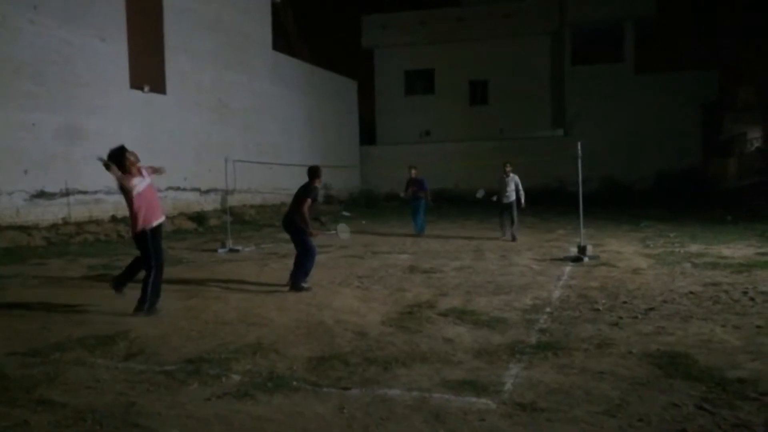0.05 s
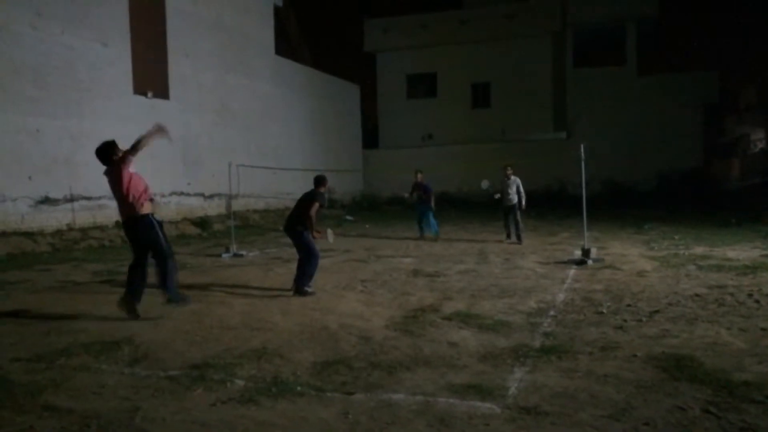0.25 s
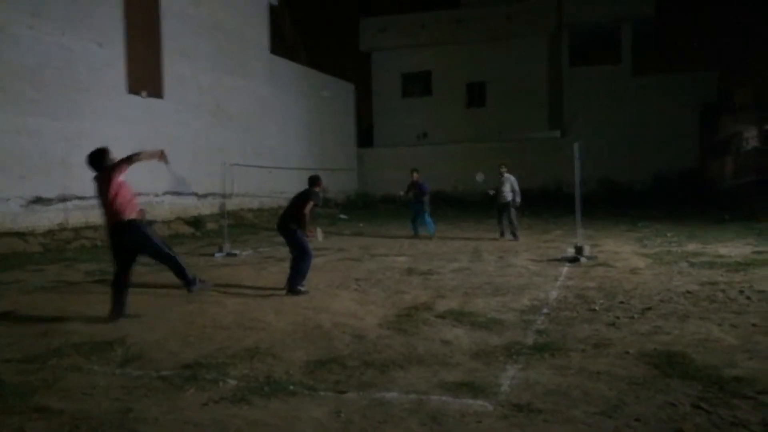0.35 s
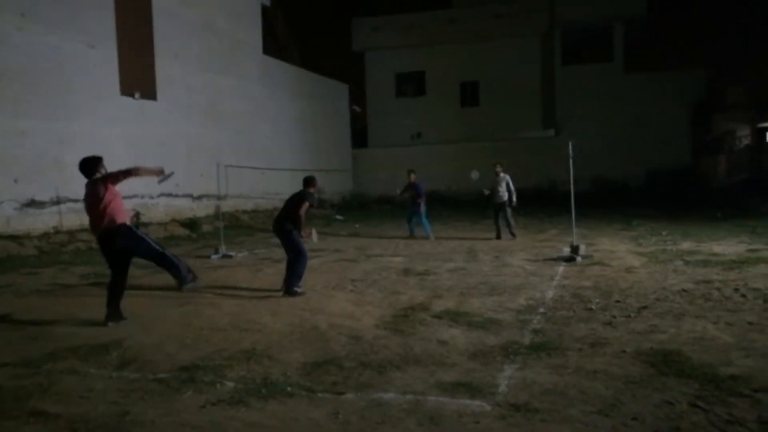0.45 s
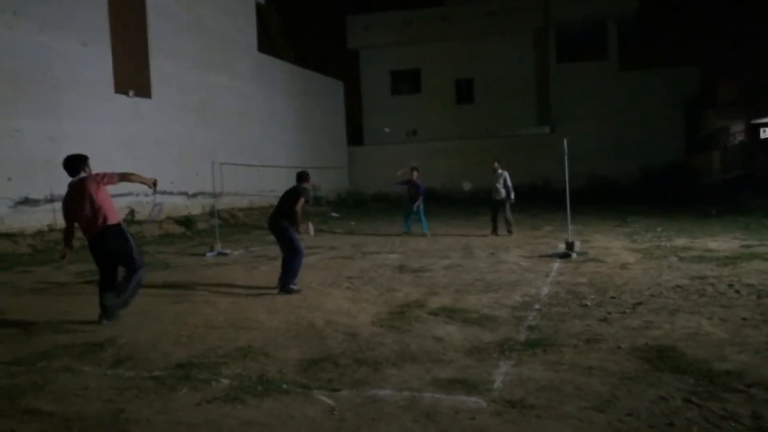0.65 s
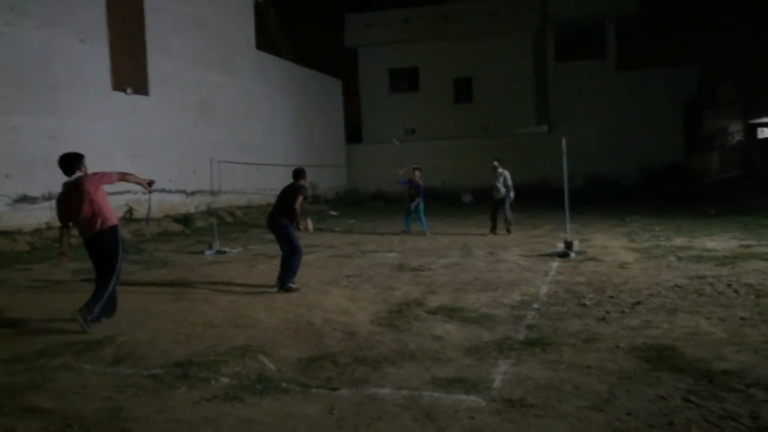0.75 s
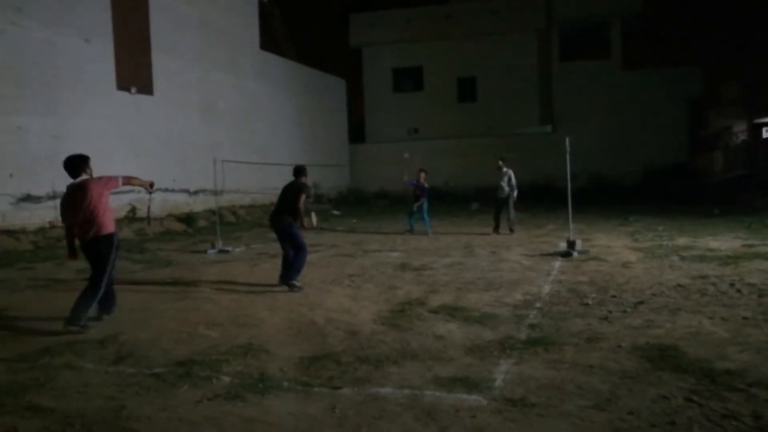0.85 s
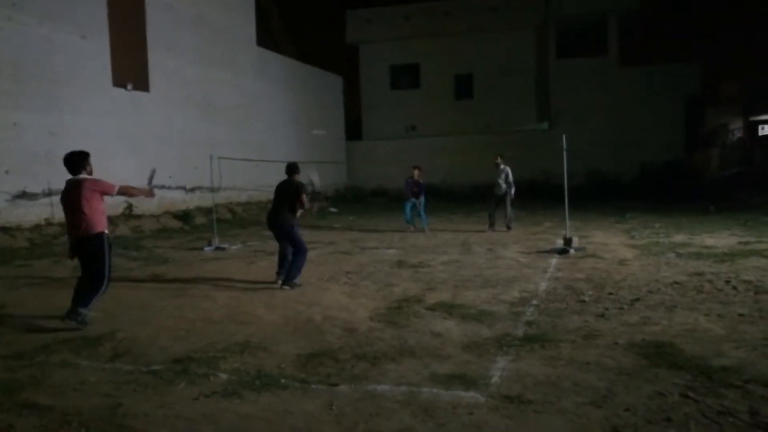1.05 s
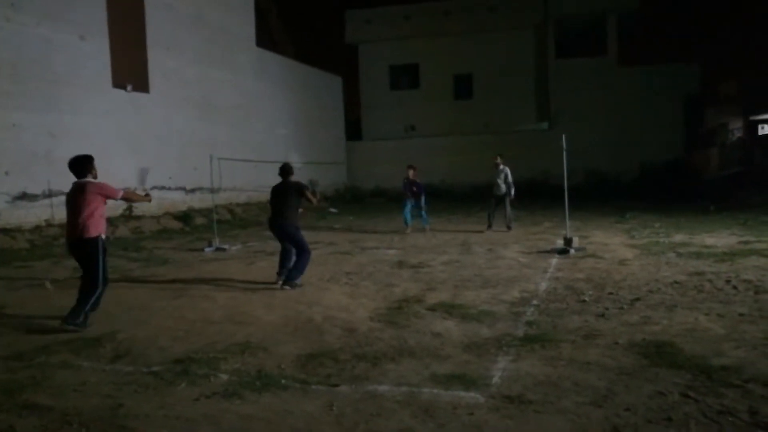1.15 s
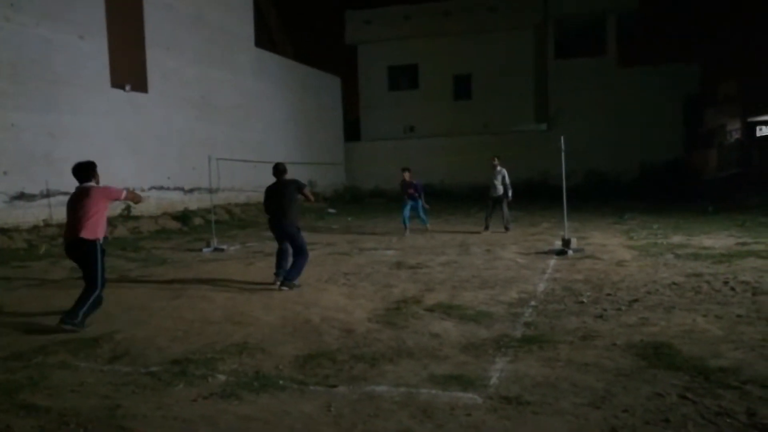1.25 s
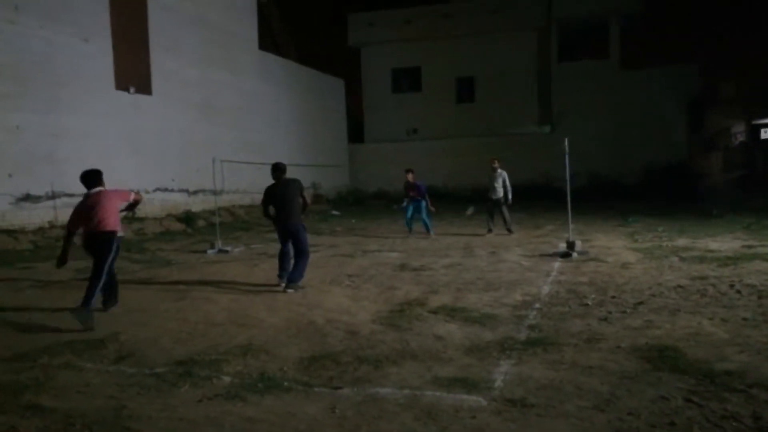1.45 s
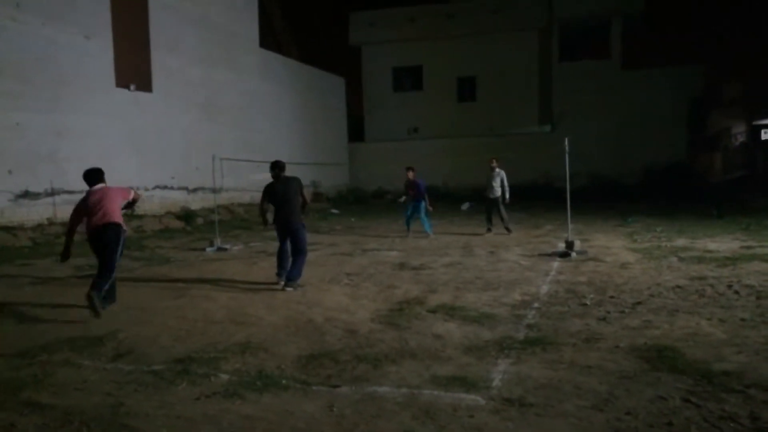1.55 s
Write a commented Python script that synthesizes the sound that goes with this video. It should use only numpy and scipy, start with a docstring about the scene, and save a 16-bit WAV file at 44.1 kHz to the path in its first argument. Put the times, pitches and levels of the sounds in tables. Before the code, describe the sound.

Badminton in a walled dirt yard, microphone near one player: a sharp, bright racket crack with quick echoes and a low boom, soft steps, a shoe slide, a fainter distant string ping, then more dull footfalls.

```python
"""Badminton on a dirt court between house walls at night, over a low outdoor rumble and soft hiss.
A near racket swishes (a noise whistle) and cracks against the shuttlecock: a shaped noise burst plus
decaying string and frame modes. The walls throw the crack back as delayed, smeared copies and the yard
booms. Feet land (dull bursts) and a shoe slides on grit (bright noise); then a far racket returns the
shuttle with a ping of its strings. Last, the rumble swells and more feet land."""
import sys
import numpy as np
from scipy import signal
from scipy.fft import rfft, irfft
from scipy.io import wavfile
from scipy.ndimage import uniform_filter1d

SR = 44100
rng = np.random.default_rng(int(sys.argv[2]) if len(sys.argv) > 2 else 0)


def dump(signal):
    """Clip the signal to [-1, 1] and save it as 16-bit WAV at the path in sys.argv[1]."""
    limited = np.clip(np.atleast_2d(signal).T, -1, 1)
    pcm = np.round(limited * 32767).astype(np.int16)
    wavfile.write(sys.argv[1], SR, pcm)


N = 70560  # samples, 1.6 s
EDGE_HZ = 15900  # upper band limit


def amp(db):
    """Amplitude ratio: 20 dB is a factor of ten."""
    return 10 ** (np.asarray(db) / 20)


def unit(x):
    """Normalisation: scales to a root-mean-square of 1."""
    return x / np.sqrt(np.mean(x ** 2) + 1e-20)


def read(points, hz):
    """Logarithmic frequency scale: interpolates a (frequency, value) table along it."""
    f, value = np.transpose(points)
    return np.interp(np.log(hz + 1), np.log(f + 1), value)


def add(mix, start, sound):
    """Superposition: adds a stereo sound into the mix from a start time [s], cut at the end."""
    part = mix[:, round(start * SR):][:, :sound.shape[1]]
    part += sound[:, :part.shape[1]]


def colour(x, points, size=4096):
    """Minimum-phase filtering: a causal response with the given (frequency [Hz], gain [dB]) shape."""
    hz = abs(np.fft.fftfreq(size, 1 / SR))
    log_gain = np.log(amp(read(points, hz)))
    # the Hilbert transform of the log gain gives the minimum phase
    response = np.exp(np.conj(signal.hilbert(log_gain)))
    taps = np.fft.ifft(response).real[:size // 2]
    return signal.fftconvolve(x, taps[None], axes=1)[:, :x.shape[1]]


def lean(x, points):
    """Interchannel level difference: splits (frequency [Hz], left minus right [dB]) equally."""
    left = colour(x[:1], [(hz, db / 2) for hz, db in points])
    right = colour(x[1:], [(hz, -db / 2) for hz, db in points])
    return np.vstack([left, right])


def pair(x, alike):
    """Interchannel coherence: mixes two unrelated noises as mid and side to the tabled likeness."""
    likeness = read(alike, np.fft.rfftfreq(x.shape[1], 1 / SR))
    angle = np.arccos(np.clip(likeness, 0, 1)) / 2
    mid, side = rfft(x) * [np.cos(angle), np.sin(angle)]
    return irfft([mid + side, mid - side], x.shape[1])


# left-right likeness of steady noise: (frequency [Hz], likeness [0-1])
NOISE_ALIKE = [(30, 1), (120, 1), (240, 0.99), (480, 0), (1200, 0), (15000, 0)]


def swell(levels, shape):
    """Amplitude modulation: coloured noise follows a (time [s], level [dB]) curve."""
    noise = unit(colour(pair(rng.standard_normal((2, N)), NOISE_ALIKE), shape))
    t = np.arange(N) / SR
    return noise * amp(np.interp(t, *np.transpose(levels), left=-150, right=-150))


# left-right likeness of impacts and reverberation: (frequency [Hz], likeness [0-1])
IMPACT_ALIKE = [(30, 0.35), (180, 1), (350, 0.81), (900, .5), (2000, 0.027), (5000, 0), (15000, 0)]


def burst(t60, rise=1e-4, size=12288, count=6):
    """Impulsive excitation: decaying noise, nearly even in spectrum, mean channel energy 1."""
    t = np.arange(size) / SR
    envelope = (1 - np.exp(-t / rise)) * amp(-60 * t / t60)
    x = pair(rng.standard_normal((2, size)), IMPACT_ALIKE) * envelope
    # alternately flatten the spectrum and confine the sound in time
    for _ in range(count):
        flat = irfft(np.exp(1j * np.angle(rfft(x))))
        x = flat * np.minimum(10 * envelope, 1)
    return unit(x) / np.sqrt(size)


# steady background spectrum: (frequency [Hz], relative level per Hz [dB])
AIR_SPECTRUM = [(12, -30), (22, -3), (50, 0.95), (90, -6), (137, -5), (233, -13), (375, -23), (620, -27),
                (800, -23), (1120, -15.5), (1400, -22), (2060, -23), (2600, -20), (3400, -31), (5900, -36),
                (7100, -33.5), (7900, -41), (15800, -44)]
AIR_DB, AIR_PATCHY_DB = -54, 1.3  # overall rms level; rms of the level drift


def air():
    """Stationary noise with slow modulation: distant rumble and soft hiss drift in patches."""
    noise = pair(rng.standard_normal((2, N)), NOISE_ALIKE)
    hz, t, z = signal.stft(noise, SR, nperseg=2048)
    patches = rng.standard_normal(z.shape[1:])  # frequency by time
    patches = uniform_filter1d(patches, size=10, axis=0)
    patches = unit(uniform_filter1d(patches, size=5, axis=1))
    z = z * amp(read(AIR_SPECTRUM, hz)[:, None] + AIR_PATCHY_DB * patches)
    return amp(AIR_DB) * unit(signal.istft(z, SR, nperseg=2048)[1][:, :N])


# swelling low rumble: (time [s], level [dB])
RUMBLE_LEVELS = [(.9, -77), (.96, -59.5), (1.02, -48.5), (1.08, -64), (1.25, -72), (1.3, -57), (1.39, -54),
                 (1.45, -75)]
# its spectrum: (frequency [Hz], relative level [dB])
RUMBLE_SPECTRUM = [(15, -1), (40, -4), (65, 4.5), (110, -13.5), (250, -43), (1000, -72)]


def rumble():
    """Low-frequency noise under an envelope: the rumble swells twice."""
    return swell(RUMBLE_LEVELS, RUMBLE_SPECTRUM)


# boom of the yard after the smash: (time [s], level [dB])
BOOM_LEVELS = [(.22, -59), (.27, -50.5), (.36, -53), (.45, -63), (.7, -66)]
# its spectrum: (frequency [Hz], relative level [dB])
BOOM_SPECTRUM = [(30, -29), (85, -7), (140, 2.5), (220, -5), (400, -28), (1500, -64)]


def boom():
    """Low-frequency reverberation: noise near 140 Hz rises at the smash and dies away."""
    return swell(BOOM_LEVELS, BOOM_SPECTRUM)


# diffuse ring of the yard: (frequency [Hz], level [dB])
YARD_SPECTRUM = [(100, -14.5), (300, -6.5), (900, -8), (2500, -7.5), (4000, -6.5), (7000, -8.5),
                 (10000, -4), (15000, -9)]
# its decay: (frequency [Hz], time to fall 60 dB [s])
YARD_DECAY = [(100, 0.65), (400, 0.66), (1000, 0.61), (2700, 0.99), (5000, 0.89), (8000, 0.61),
              (11000, 0.76), (15000, 0.25)]
DIFFUSE_RISE_S = .008


def yard(x):
    """Diffuse reverberation: convolution with noise whose decay time depends on frequency."""
    noise = pair(rng.standard_normal((2, SR)), IMPACT_ALIKE)
    hz, t, z = signal.stft(noise, SR, nperseg=256)
    decay = amp(-60 * t / read(YARD_DECAY, hz)[:, None])
    rise = 1 - np.exp(-t / DIFFUSE_RISE_S)
    tail = signal.istft(z * decay * rise, SR, nperseg=256)[1]
    tail = colour(tail / np.linalg.norm(tail[0]), YARD_SPECTRUM)
    return signal.fftconvolve(x, tail, axes=1)[:, :N]


# shoe sliding on grit: (time [s], level [dB])
SCUFF_LEVELS = [(.62, -82), (.72, -70.5), (.77, -64), (.81, -65.5), (.84, -86)]
# its spectrum: (frequency [Hz], relative level [dB])
SCUFF_SPECTRUM = [(500, -34), (5000, -13), (8000, -12), (10000, 1), (12000, -3), (14000, -12), (16000, -13)]


def scuff():
    """Friction noise: one gritty slide, brightest near 10 kHz."""
    return swell(SCUFF_LEVELS, SCUFF_SPECTRUM)


# footfalls: (time [s], relative level [dB], nominal time to fall 60 dB [s])
FOOTFALLS = [(.275, -3, 0.19), (.349, -1, 0.018), (.385, 1, 0.16), (.733, -8, .06), (0.965, -3, 0.045),
             (1.222, 0.5, .018), (1.246, -11, 0.025), (1.258, -4.5, 0.043), (1.276, -4.5, 0.11),
             (1.31, -7.5, 0.15), (1.343, -7, 0.068)]
# their spectrum: (frequency [Hz], level [dB])
FOOTFALL_SPECTRUM = [(40, -25), (130, -11.5), (290, -2.5), (600, -12), (1100, -21.5), (2500, -25),
                     (4000, -44), (15000, -58)]


def footsteps():
    """Damped impact: packed dirt passes the lows, so each landing is dull; the yard rings too."""
    steps = np.zeros((2, N))
    for start, db, t60 in FOOTFALLS:
        add(steps, start, amp(db) * burst(t60))
    steps = colour(steps, FOOTFALL_SPECTRUM)
    return steps + yard(steps)


# swing of the near racket: (time [s], level [dB], whistle frequency [Hz])
SWING_PATH = [(.178, -80, 626), (.189, -54.5, 608), (.204, -55, 604), (.219, -48, 650), (.235, -86, 520)]
SWING_WIDTH_HZ = 110  # bandwidth of each of two equal poles


def swing():
    """Aeolian tone: air whistles round the shaft into the blow, a narrow noise band gliding in pitch."""
    t = np.arange(N) / SR
    path_t, db, hz = np.transpose(SWING_PATH)
    pole = np.exp(-np.pi * SWING_WIDTH_HZ / SR)
    noise = rng.standard_normal(N) + 1j * rng.standard_normal(N)
    flutter = signal.lfilter([1 - pole], np.poly([pole, pole]), noise)
    # shift the low-pass flutter up to the gliding frequency
    cycles = np.cumsum(np.interp(t, path_t, hz)) / SR
    whistle = (flutter * np.exp(2j * np.pi * cycles)).real
    return unit(whistle) * amp(np.interp(t, path_t, db, left=-150, right=-150))


CRACK_RISE_S = .0007


def ringing(modes, t):
    """Modal synthesis: strings and frame ring as exponentially decaying sines."""
    ring = 0
    for hz, db, t60 in modes:
        # opposite phase shifts give the channels their likeness
        shift = np.arccos(np.clip(read(IMPACT_ALIKE, hz), 0, 1)) / 2 * np.array([[-1], [1]])
        envelope = amp(db - 60 * t / t60) * (1 - np.exp(-t / CRACK_RISE_S))
        ring = ring + envelope * np.sin(2 * np.pi * hz * t + shift)
    return ring


AIR_LOSS_HZ, AIR_LOSS_DB_PER_S = 6100, 48  # loss starts here; its rate at EDGE_HZ, per second of delay
LIFT_WIDTH = 1.244  # frequency ratio from a lift's centre to its foot


def reflection(outward, delay, smear, hz, lift_db):
    """Rough-wall reflection: smeared in time, one band favoured, treble lost along the path."""
    echo = signal.fftconvolve(outward, burst(smear), axes=1)
    echo = colour(echo, [(hz / LIFT_WIDTH, 0), (hz, lift_db), (hz * LIFT_WIDTH, 0)])
    return colour(echo, [(AIR_LOSS_HZ, 0), (EDGE_HZ, -AIR_LOSS_DB_PER_S * delay)])


# left-right shading of sound straight from a racket, as it faces: (frequency [Hz], left minus right [dB])
DIRECT_LEAN = [(300, -3.5), (1300, -2), (2500, -1.5), (4000, 7), (5600, 9), (8500, 5), (13500, -2.5)]
RING_BACK_DB = -2.5  # the ringing carries to the walls less than the crack does
SCATTER_DB, SCATTER_T60_S = -8.5, .11  # near scatter, nominal decay


def racket(blow, crack_spectrum, crack_t60, modes, echoes, wet_db):
    """Impact and image sources: the cork cracks, the racket rings, ground and walls answer."""
    start, db = blow
    crack = colour(burst(crack_t60, CRACK_RISE_S), crack_spectrum)
    ring = ringing(modes, np.arange(crack.shape[1]) / SR)
    outward = crack + amp(RING_BACK_DB) * ring
    heard, sent = np.zeros((2, 2, N))
    add(sent, start, outward)
    add(heard, start, lean(crack + ring, DIRECT_LEAN))
    scatter = signal.fftconvolve(outward, burst(SCATTER_T60_S, DIFFUSE_RISE_S), axes=1)
    add(heard, start, amp(SCATTER_DB) * scatter)
    for delay, echo_db, smear, hz, lift_db in echoes:
        echo = reflection(outward, delay, smear, hz, lift_db)
        add(heard, start + delay, amp(echo_db) * echo)
    return amp(db) * (heard + amp(wet_db) * yard(sent))


# far racket's blow: (time [s], level [dB])
RETURN_BLOW = (.8948, -22.5)
# crack of the cork on its strings: (frequency [Hz], relative level [dB])
RETURN_SPECTRUM = [(100, -0.5), (270, 20.5), (500, 1), (750, 15), (1400, 2.5), (2600, 11), (3200, 8.5),
                   (3900, -2), (5200, -6), (8000, -14), (10000, -3), (13000, -18), (16000, -22)]
# its strings: (frequency [Hz], relative level [dB], time to fall 60 dB [s])
RETURN_STRINGS = [(859.5, -24.5, 0.26), (1740, -33, .16), (2720, -38, 0.14), (3330, -40, 0.11)]
# its wall echoes: (delay [s], relative level [dB], nominal smear time to fall 60 dB [s],
# favoured frequency [Hz], lift there [dB])
RETURN_WALLS = [(.0265, -1.5, 0.0011, 2650, 5.4), (.036, -2.5, .04, 5140, 12.5), (.055, -7, .05, 5030, 22),
                (.073, -10.5, .02, 3700, 17), (.09, -15, 0.41, 4800, 15)]


def far_return():
    """Modal ringing after impact: the far strings ping, longest near 860 Hz."""
    return racket(RETURN_BLOW, RETURN_SPECTRUM, crack_t60=.03, modes=RETURN_STRINGS,
                  echoes=RETURN_WALLS, wet_db=4.5)


# near racket's blow: (time [s], level [dB])
SMASH_BLOW = (.2212, 0)
# crack of the cork on its strings: (frequency [Hz], relative level [dB])
SMASH_SPECTRUM = [(60, -24), (220, -9.5), (330, 7), (700, 0), (1050, 0.5), (1400, 1), (1950, -4),
                  (2500, 10.5), (3200, 5.5), (4000, 4.5), (6000, 0), (8000, -4), (11500, -6), (13700, -6.5),
                  (16000, -16)]
# its strings and frame: (frequency [Hz], relative level [dB], time to fall 60 dB [s])
SMASH_STRINGS = [(362, -32, 0.027), (442, -38.5, 0.056), (894, -24.5, 0.052), (956, -34, 0.15),
                 (1312, -24.5, 0.034), (1606, -25, 0.028), (1793, -39.5, 0.27), (2261, -27.5, 0.059),
                 (2407, -26.5, 0.029), (2597, -27, 0.032), (3080, -33, 0.067), (3606, -27, 0.046),
                 (5406, -28, 0.029)]
# its wall echoes: (delay [s], relative level [dB], nominal smear time to fall 60 dB [s],
# favoured frequency [Hz], lift there [dB])
SMASH_WALLS = [(.034, -11, 0.033, 2460, 8), (.037, -10, 0.043, 9400, 11.5), (.047, -17, 0.024, 2500, 4),
               (.062, -20.5, 0.021, 2360, -1), (0.088, -41, .003, 3500, -6), (.112, -19, 0.00051, 4600, 7),
               (.128, -18.5, .002, 1180, 0), (.153, -22.5, 0.0051, 2500, 8.5),
               (.1645, -24, .012, 3400, 17.5), (0.18, -27.5, 0.011, 3360, 18.5),
               (0.193, -30, 0.016, 3430, 21.5), (.16, -23.5, 0.34, 5070, 12.5),
               (0.225, -29, 0.037, 2920, 10), (.264, -31, 0.056, 4800, 15.5)]


def smash():
    """Broadband impact: the near blow cracks, strings and frame ring, and walls throw it back."""
    return racket(SMASH_BLOW, SMASH_SPECTRUM, crack_t60=.028, modes=SMASH_STRINGS,
                  echoes=SMASH_WALLS, wet_db=-3)


def scene():
    """Superposition: both rackets, swing, feet and background sum linearly."""
    rackets = smash() + far_return()
    play = swing() + rackets + footsteps() + scuff()
    return play + air() + boom() + rumble()


# difference of the two microphone ports: (frequency [Hz], left minus right [dB])
PORT_LEAN = [(100, 0.5), (380, -2), (680, 8), (900, -0.5), (1300, -1), (1750, -9), (2500, -12),
             (3300, -8.5), (4300, -7), (5600, -0.5), (7500, 0), (10000, -5.5), (14000, -2.5)]


def record(dry):
    """Linear filtering: each microphone port has its own colour; then the band limit."""
    band_limit = signal.firwin(511, EDGE_HZ, window=("kaiser", 9), fs=SR)
    return signal.oaconvolve(lean(dry, PORT_LEAN), band_limit[None], "same")


dry = scene()
out = record(dry)
dump(out)
```